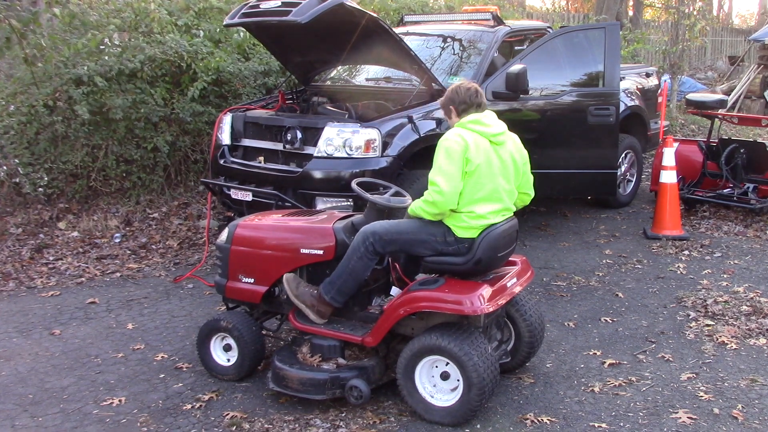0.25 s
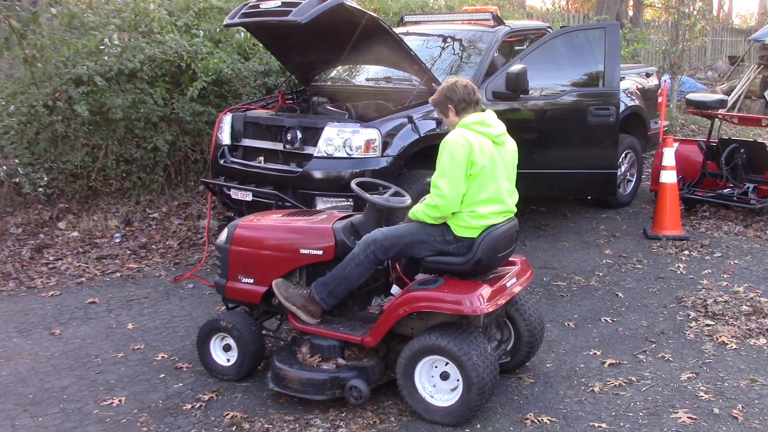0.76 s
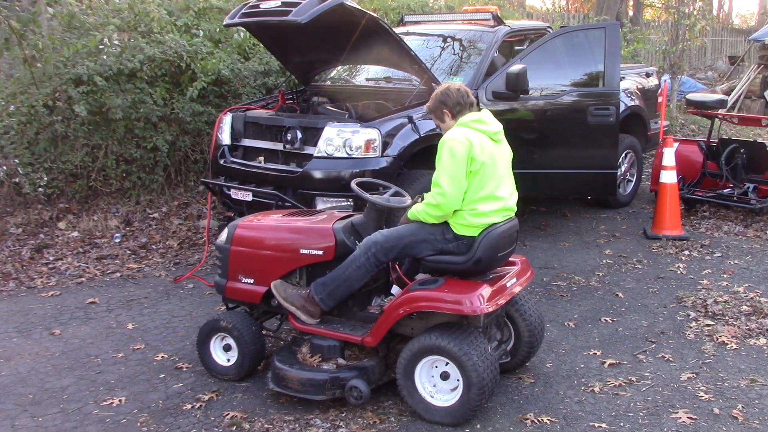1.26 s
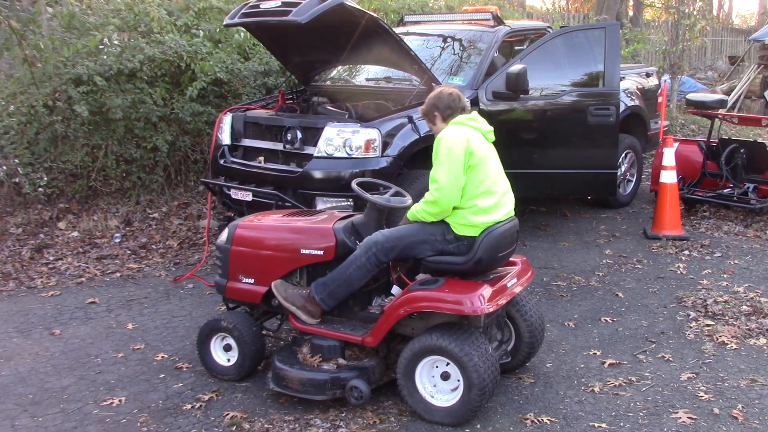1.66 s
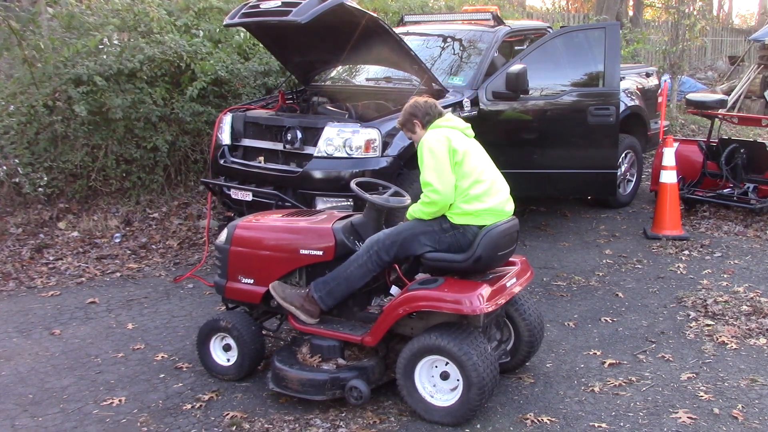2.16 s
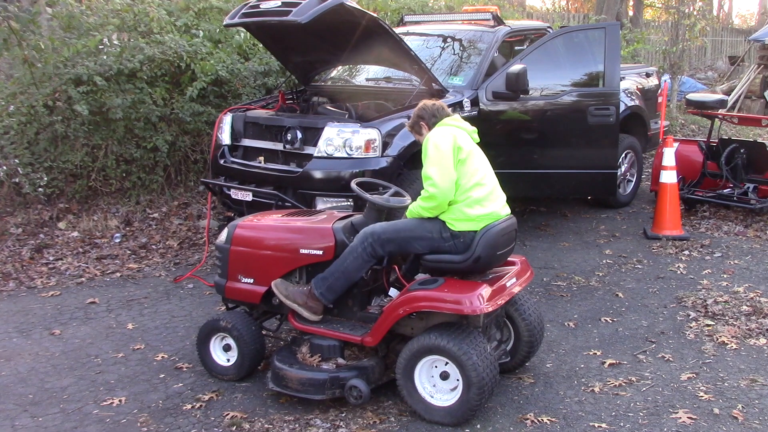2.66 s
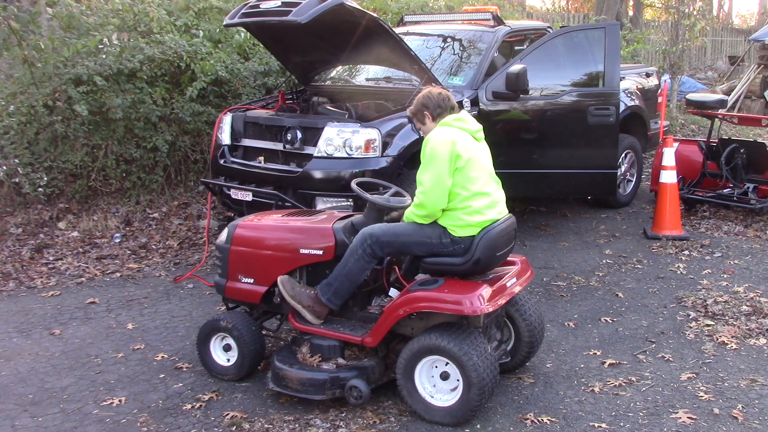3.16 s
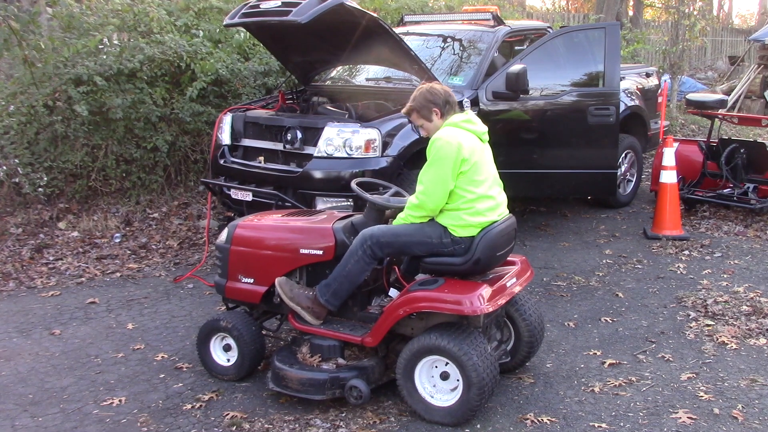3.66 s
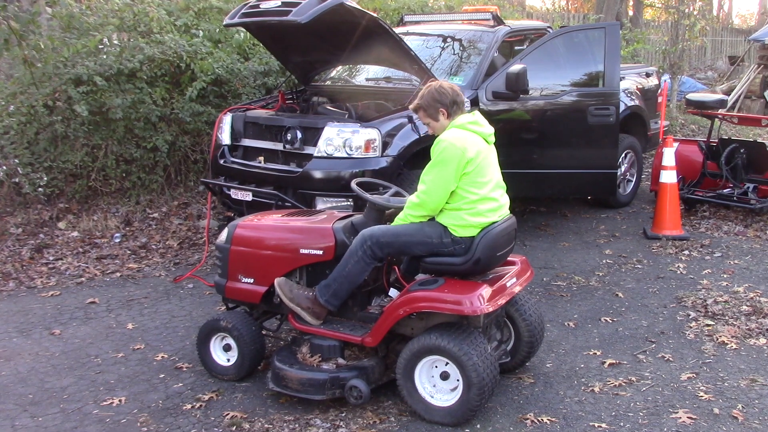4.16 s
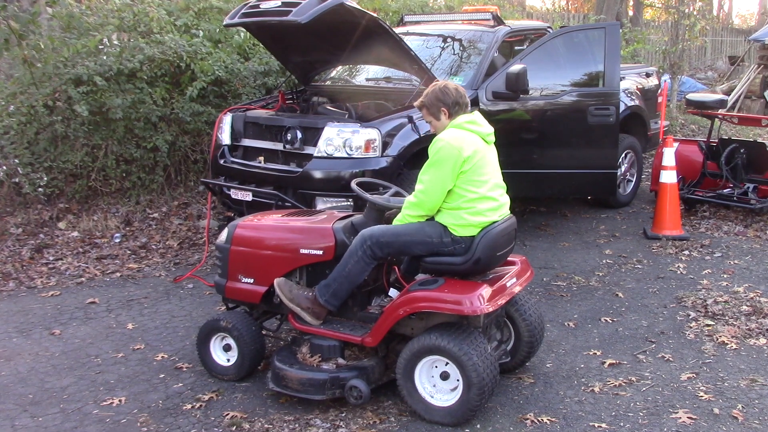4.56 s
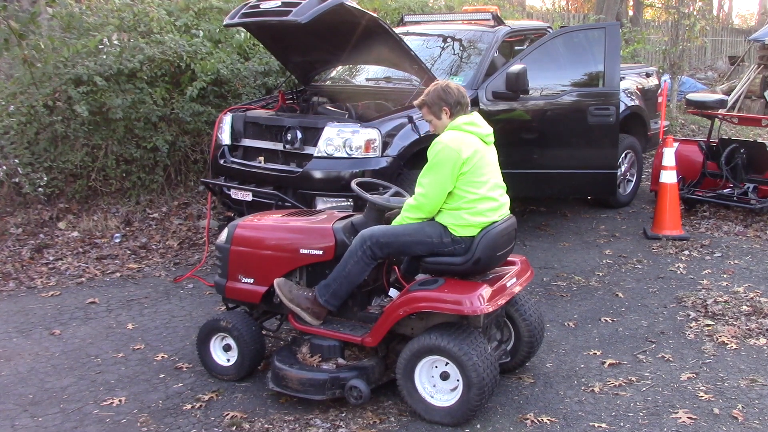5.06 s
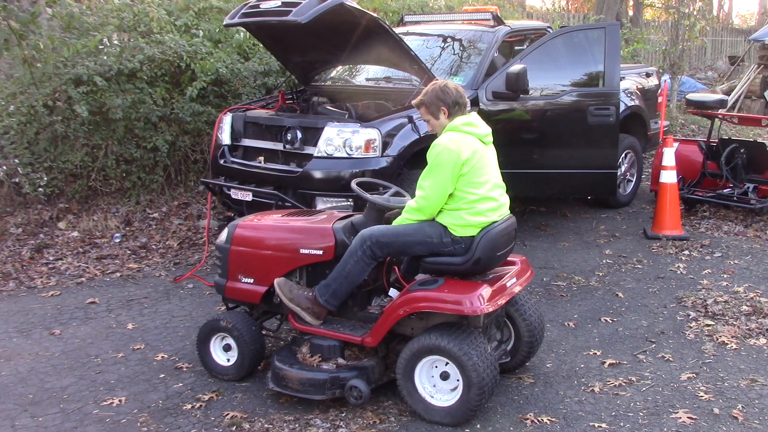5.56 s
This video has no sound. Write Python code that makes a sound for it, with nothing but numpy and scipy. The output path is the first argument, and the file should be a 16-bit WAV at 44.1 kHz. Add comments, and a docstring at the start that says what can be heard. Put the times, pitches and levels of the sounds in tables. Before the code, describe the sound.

A rider settles on a riding mower in a quiet driveway: soft knocks, a short seat creak with a squeak, one hard clunk, then small key clicks and lever clacks. After a brief gap the starter slams in and grinds, sagging at each compression, with breathy intake gulps and exhaust puffs. Close, nearly mono, with short dull outdoor reflections and a faint far bird.

```python
"""First knocks and a creaking seat as a rider settles on a riding mower in a driveway, then key and levers click.
The solenoid snaps, and the starter pinion slams into the flywheel and grinds the small petrol engine up to speed.
Each compression brakes the crank, with a double gulp of intake air before it and a puff of exhaust after.
Blows and gears are noise and impulses ringing in resonances; gas is shaped noise; yard air and a far bird lie behind.
The picture is nearly mono: only a faint hiss differs between the channels."""
import sys
import numpy as np
from scipy import signal
from scipy.fft import rfft, irfft
from scipy.io import wavfile
from scipy.ndimage import uniform_filter1d

SR = 44100
rng = np.random.default_rng(int(sys.argv[2]) if len(sys.argv) > 2 else 0)


def master(y):
    """Save y as 16-bit WAV."""
    cut = np.clip(np.atleast_2d(y).T, -1, 1)
    pcm = np.round(cut * 32767)  # scale
    wavfile.write(sys.argv[1], SR, pcm.astype(np.int16))


N = 255780
TIME = np.arange(N) / SR


def amp(db):
    """Decibels to gain."""
    return 10 ** (np.asarray(db) / 20)


def unit(x):
    """Scale to rms 1."""
    return x / np.sqrt(np.mean(x ** 2))


def crest(x):
    """Scale so that the loudest 8 ms have rms 1."""
    return x / np.sqrt(uniform_filter1d(x ** 2, size=353).max())


def noise(size=N):
    """White noise."""
    return rng.standard_normal(size)


def curves(table):
    """The columns of a table, joined by straight lines in time."""
    s, *columns = np.transpose(table)
    return [np.interp(TIME, s, column) for column in columns]


def colour(x, points):
    """Causal filter through (frequency [Hz], level [dB]) points, falling 24 dB per octave for two octaves beyond."""
    hz, db = np.transpose(points)
    size = 8192
    octave = np.log2(np.maximum(np.fft.rfftfreq(size, 1 / SR), 1))
    outside = np.abs(octave - np.clip(octave, np.log2(hz[0]), np.log2(hz[-1])))
    spectrum_db = np.interp(octave, np.log2(hz), db) - 24 * np.minimum(outside, 2)
    # folding the cepstrum gives minimum phase, so nothing sounds before its cause
    cepstrum = irfft(np.log(amp(spectrum_db)))
    cepstrum[1:size // 2] *= 2
    cepstrum[size // 2 + 1:] = 0
    return signal.fftconvolve(x, irfft(np.exp(rfft(cepstrum))))[:len(x)]


def band(x, hz, kind):
    """Third-order Butterworth filter."""
    return signal.sosfilt(signal.butter(3, hz, kind, fs=SR, output="sos"), x + 1e-18)


def resonate(x, peaks):
    """Parallel (frequency [Hz], width [Hz], level [dB]) resonances of alternating polarity."""
    out = np.zeros(len(x))
    for k, (hz, width, db) in enumerate(peaks):
        b, a = signal.iirpeak(hz, hz / width, fs=SR)
        out += (-1) ** k * amp(db) * signal.lfilter(b, a, x + 1e-18)
    return out


def fade(t, t60):
    """Exponential decay by 60 dB in t60 seconds."""
    return np.exp(-np.log(1000) * t / t60)


def swell(peak_s, attack, release):
    """A smooth rise to 1 and a smooth fall."""
    t = TIME - peak_s
    return np.exp(-.5 * (t / np.where(t < 0, attack, release)) ** 2)


def walk(rate):
    """Smooth random wander with rms 1, taking a new direction `rate` times a second."""
    k = int(SR / rate)
    steps = np.repeat(noise(N // k + 1), k)
    return unit(uniform_filter1d(steps, k)[:N])


def wavering_tone(hz):
    """Sine that follows a moving pitch."""
    return np.sin(2 * np.pi * np.cumsum(hz) / SR)


def pulses(hz, jitter, scatter_db):
    """One impact in each cycle, each a little early or late and of its own size."""
    phase = np.cumsum(hz) / SR
    chance = noise((N // 10, 2))[:int(phase[-1])]
    at = np.interp(np.arange(len(chance)) + jitter * chance[:, 0], phase, np.arange(N))
    size = amp(scatter_db * np.clip(chance[:, 1], -2, 2))
    return np.bincount(at.astype(int), size, N)


def bend(x, share):
    """Let the pitch of x run sharp or flat by a moving share, through a wandering delay."""
    drift = signal.lfilter([1], [1, -np.exp(-1 / SR / .1)], share)
    return np.interp(np.arange(N) + drift, np.arange(N), x)


def add(out, s, x):
    """Mix x into out from time s."""
    i = max(int(s * SR), 0)
    out[i:i + len(x)] += x[:N - i]


# microphone hiss spectrum: (frequency [Hz], relative level [dB])
HISS_COLOUR = [(25, -16), (65, -14), (190, -5.5), (450, -3), (1000, -10), (2100, -16.5), (3000, -25.5),
               (15000, -39)]


def hiss():
    """Very faint noise of the microphone capsules."""
    return amp(-81.5) * unit(colour(noise(), HISS_COLOUR))


# outdoor air spectrum: (frequency [Hz], relative level [dB])
YARD_COLOUR = [(15, -83), (25, -31), (101, -5), (164, -6.5), (233, -4.5), (267, -8.5), (359, -13),
               (421, -5.5), (648, -11.5), (848, -9.5), (1020, -14.5), (1240, -16.5), (7300, -28),
               (12800, -36.5), (15500, -48)]


def yard():
    """Quiet outdoor air with the wavering hum of distant motors."""
    air = unit(colour(noise(), YARD_COLOUR)) * amp(0.55 * walk(3.15))
    motors = unit(resonate(noise(), [(205, 25, 1), (425, 8, 0), (850, 25, -3)]))
    waver = amp(2 * walk(2.5))
    return amp(-60.5) * (air + amp(-8.5) * motors * waver)


# far bird's whistles: (time [s], length [s], start pitch [Hz], end pitch [Hz], level before the flutter [dB])
BIRD_WHISTLES = [(.14, .09, 3900, 3800, -71), (1.8, .13, 3700, 3630, -69), (1.94, .14, 3560, 3460, -69),
                 (3.77, .17, 3680, 3550, -72)]


def bird():
    """A far bird's thin whistles: fluttering sines that slide down."""
    out = np.zeros(N)
    for s, length, start_hz, end_hz, db in BIRD_WHISTLES:
        hz = np.linspace(start_hz, end_hz, int(length * SR))
        add(out, s, amp(db) * np.hanning(len(hz)) ** .5 * wavering_tone(hz))
    flutter = amp(3 * walk(70) - 1)
    return out * flutter


def echoes(x, wet_db, t60):
    """Dull, scattered reflections from the parked truck, the hedge and the house, as decaying noise."""
    t = TIME[:SR // 2]
    build_up = np.clip((t - .008) / 0.018, 0, 1)
    tail = band(noise(len(t)), 3040, "low") * fade(t, t60) * build_up
    return amp(wet_db) * signal.fftconvolve(x, tail / np.linalg.norm(tail))[:N]


def thud():
    """One soft, very low thud under the cranking: a short swell of a 28 Hz sine."""
    s = 5.02
    return amp(-55) * swell(s, 0.013, 0.013) * np.sin(2 * np.pi * 28 * (TIME - s))


# light clicks of the key: (time [s], level [dB])
KEY_CLICKS = [(.328, -53.5), (.967, -52.5), (2.169, -54.5), (2.538, -49), (2.6, -52), (2.6385, -51),
              (2.668, -50), (2.752, -57), (3.151, -63), (3.685, -57)]
# their spectrum: (frequency [Hz], relative level [dB])
KEY_COLOUR = [(500, -9), (1500, 2.5), (2400, -0.5), (3200, 6), (4400, -2.5), (5100, -5.5), (6300, 4.5),
              (8200, -1.5), (11000, -6.5), (15500, -20)]


def key():
    """Small bright clicks, each a sharp tick with a short scrape behind it."""
    out, t = np.zeros(N), TIME[:SR // 4]
    for s, db in KEY_CLICKS:
        tick_and_scrape = fade(t, 0.0078) + 1.2 * fade(t, 0.14)
        contact = noise(len(t)) * tick_and_scrape
        add(out, s, amp(db) * crest(colour(contact, KEY_COLOUR)))
    return out


# resonances of seat and hinge: (frequency [Hz], width [Hz], relative level [dB])
SEAT_BODY = [(317, 25, 2.5), (1021, 82, 0.5), (1590, 21, -19), (2010, 61, -5), (2510, 44, -5.5),
             (2805, 71, -8), (3600, 48, -15)]
HINGE_BODY = [(5900, 26, 3), (6800, 170, 0.5), (7140, 37, 5), (8300, 190, 0), (9560, 60, 1)]
# each sound of the seat builds and dies away: (peak time [s], attack [s], release [s])
CREAK_SWELL = (.53, .15, .03)
SQUEAK_SWELL = (.512, .02, .019)
SCRAPE_SWELL = (.49, .024, .024)


def seat():
    """Stick-slip creak of the seat, which locks briefly into a squeak while its hinge scrapes."""
    slips = unit(pulses(420 * amp(2 * walk(25)), jitter=0.33, scatter_db=1.5))
    rub = slips + amp(-3) * noise()
    rasp_colour = [(250, -3), (400, 7.5), (700, 2.0), (1100, 3.5), (2000, 0.5), (2800, -18), (4200, -16)]
    rasp = unit(colour(rub, rasp_colour))
    # the shifting load bends the resonances
    creak = unit(unit(resonate(slips, SEAT_BODY)) + amp(-0.5) * rasp)
    creak = bend(creak, 0.0193 * walk(28))
    scrape = bend(unit(resonate(slips, HINGE_BODY)), .012 * walk(35)) * amp(3.9 * walk(89.1))
    scrape = scrape + amp(-8.5) * band(rub, 5500, "high")
    squeak = unit(wavering_tone(1020 * (1 + 0.0478 * walk(160))) * amp(3.9 * walk(119.3)))
    sound = amp(-48.5) * swell(*CREAK_SWELL) * creak
    sound += amp(-39) * swell(*SQUEAK_SWELL) * squeak
    sound += amp(-52.5) * swell(*SCRAPE_SWELL) * scrape
    return sound * (TIME > .33)  # silent until the seat is loaded


def blows(table, modes, spectrum, ring_db, note_db, bass_hold, treble_hold, grain_db, rise_share):
    """Loose parts chatter after each blow, sound their note and ring the body; long rattles start softly."""
    out, t = np.zeros(N), TIME[:SR // 2]
    for s, bass_db, middle_db, treble_db, t60, hz in table:
        bounces = amp(grain_db * walk(400)[:len(t)])
        # the holds stretch or shorten the rattle of the outer bands
        parts = [(bass_db, 900, "low", bass_hold),
                 (middle_db, (900, 4500), "band", 1),
                 (treble_db, 4500, "high", treble_hold)]
        for db, edges, kind, hold in parts:
            rise = np.minimum(t / (rise_share * t60 * hold), 1)
            chatter = noise(len(t)) * bounces * rise * fade(t, t60 * hold)
            clunk = colour(chatter, spectrum)
            clunk = clunk + resonate(clunk, [(hz, hz / 22, note_db)])
            sound = unit(clunk) + amp(ring_db) * unit(resonate(chatter, modes))
            add(out, s, amp(db) * crest(band(sound, edges, kind)))
    return out


# spectrum of knocks and levers: (frequency [Hz], relative level [dB])
CLUNK_COLOUR = [(47, -38), (80, -52), (173, -5.5), (343, 1), (532, 3.5), (663, 4), (884, -2.5), (1030, -4),
                (1500, -11), (3540, -12), (5040, -31), (5880, -16.5), (8550, -17.5), (11100, -32),
                (15500, -43)]
# dash controls being set:
# (time [s], bass [dB], middle [dB], treble [dB], middle rattle t60 [s], note of the struck part [Hz])
LEVER_BLOWS = [(3.489, -57.5, -68, -86, 0.095, 520), (3.572, -57, -46, -63, 0.13, 1780),
               (3.646, -50, -55, -82, 0.029, 510), (3.7385, -43, -41.5, -63, 0.018, 1730),
               (3.879, -44.5, -47.5, -79, .051, 490), (3.891, -51.5, -46, -56.5, 0.05, 1430)]
# resonances of the dash: (frequency [Hz], width [Hz], relative level [dB])
DASH_BODY = [(455, 35, 9), (576, 29, 14), (699, 16, 5.5), (1406, 63, -4), (1670, 55, -7), (2540, 33, -7),
             (2960, 20, -21), (3170, 43, -10)]


def levers():
    """Dash levers clack into place and ring the dash."""
    return blows(LEVER_BLOWS, DASH_BODY, CLUNK_COLOUR, ring_db=1, note_db=11,
                 bass_hold=1.1, treble_hold=.8, grain_db=1.5, rise_share=.025)


# seat, pedal and levers striking the chassis:
# (time [s], bass [dB], middle [dB], treble [dB], middle rattle t60 [s], note of the struck part [Hz])
CHASSIS_BLOWS = [(0.001, -48.5, -54.5, -69.5, 0.29, 510), (.271, -48.5, -50, -69, 0.11, 506),
                 (.334, -48, -49.5, -66, 0.18, 1640), (.511, -52, -43, -66, 0.13, 985),
                 (.548, -42, -54, -57.5, 0.12, 1040), (.841, -34.5, -35.5, -31, 0.13, 870),
                 (1.776, -45, -42.5, -53, 0.09, 1750), (2.199, -38, -34.5, -46, 0.12, 1306),
                 (2.24, -40.5, -51, -62, 0.17, 695), (2.811, -39, -43, -57, 0.22, 1050),
                 (2.85, -45.5, -47.5, -53.5, .19, 675)]
# resonances of the chassis: (frequency [Hz], width [Hz], relative level [dB])
CHASSIS_BODY = [(360, 62, 10), (690, 13, 12), (1649, 33, -1.5), (2787, 27, -2), (3407, 16, -13.5),
                (3740, 30, -8.5), (5700, 34, -17), (7060, 61, -13), (7000, 180, -23), (8270, 21, -32),
                (8970, 98, -11)]
# thin ring of steel after the hardest knock: (frequency [Hz], level [dB], t60 [s])
STEEL_RING = [(14700, -52, .4), (15330, -56, .55)]


def knocks():
    """Seat, pedal and levers strike the chassis; the hardest knock leaves thin decaying sines of steel."""
    out = blows(CHASSIS_BLOWS, CHASSIS_BODY, CLUNK_COLOUR, ring_db=-4.5, note_db=7,
                bass_hold=1.39, treble_hold=0.77, grain_db=2.5, rise_share=0.0075)
    t = TIME[:SR // 2]
    for hz, db, t60 in STEEL_RING:
        tone = np.sin(2 * np.pi * hz * t + rng.uniform(0, 2 * np.pi))
        add(out, .842, amp(db) * fade(t, t60) * tone)
    return out


# solenoid and pinion slamming home:
# (time [s], bass [dB], middle [dB], treble [dB], middle rattle t60 [s], note of the struck part [Hz])
SLAM_BLOWS = [(4.349, -43, -27.5, -34, 0.07, 1350), (4.356, -39, -33, -47, 0.069, 2450),
              (4.373, -34, -32, -30.5, .08, 7700), (4.382, -21.5, -24, -33, 0.071, 1690),
              (4.398, -22.5, -33, -44, .07, 480)]
# what they ring: (frequency [Hz], width [Hz], relative level [dB])
SLAM_BODY = [(432, 45, -6), (655, 30, 6), (1100, 38, -8.5), (1280, 15, 2), (1530, 240, -16), (2130, 18, -3),
             (2450, 22, -12), (2950, 24, -23), (3240, 112, -9)]
# their spectrum: (frequency [Hz], relative level [dB])
SLAM_SPECTRUM = [(100, -22), (210, -4), (480, -0.5), (660, 9), (950, -4.5), (1400, 1.5), (2500, 2.5),
                 (3200, -3.5), (4500, -24), (6200, -17.5), (9000, -17), (15500, -38)]


def slams():
    """The solenoid snaps and throws the pinion into the flywheel."""
    return blows(SLAM_BLOWS, SLAM_BODY, SLAM_SPECTRUM, ring_db=-5, note_db=10,
                 bass_hold=1.1, treble_hold=.9, grain_db=1, rise_share=.045)


# muffler resonances: (frequency [Hz], width [Hz], relative level [dB])
MUFFLER = [(129, 56, -4), (171.4, 70, 3.5), (219, 160, -0.5)]
# turbulence spectrum: (frequency [Hz], relative level [dB])
TURBULENCE_COLOUR = [(150, -39), (230, -10), (400, -6), (650, -3), (1000, -8), (2000, -15), (3300, -29),
                     (5000, -48), (7000, -31), (15000, -45)]


def puff(s, db, length, rasp_db):
    """A slug of gas thumps through the muffler, with a rasp of turbulence."""
    out, t = np.zeros(N), TIME[:SR // 4]
    lead = .08  # seconds of room for the rise of the flow
    flow = np.exp(-.5 * ((t - lead) / length) ** 2)
    front = np.exp(-.5 * ((t - lead) / 0.00096) ** 2)
    slug = unit(front) + amp(-3) * unit(band(flow * noise(len(t)), 290, "low"))
    thump = band(resonate(slug, MUFFLER), 110, "high")
    rasp = colour(flow * noise(len(t)), TURBULENCE_COLOUR)
    add(out, s - lead - .004, amp(db + 5.5) * crest(thump))
    add(out, s - lead, amp(db + rasp_db) * crest(rasp))
    return out


# piston at the top of a compression (a puff adds 5.5 dB to its thump):
# (time [s], free crank speed [turns/s], intake base [dB], intake rasp over base [dB], exhaust base [dB])
STROKES = [(4.598, 3.6, -54.5, 18.5, -40.5), (5.066, 5.94, -43, -7, -48), (5.386, 6.5, -38, 0, -48),
           (5.684, 6.72, -39.5, 5.5, -46)]
# the two gulps of each intake: (crank angle after the top [turns], length [s], level over base [dB])
GULPS = [(-.42, 0.01, -5), (-.25, 0.013, 1.5)]


def valves():
    """The valves keep their crank angles: a double gulp before each compression, a puff of exhaust after it."""
    out = np.zeros(N)
    for s, speed, intake_db, rasp_db, exhaust_db in STROKES:
        for turns, length, db in GULPS:
            out += puff(s + turns / speed, intake_db + db, length, rasp_db)
        out += puff(s + 0.41 / speed, exhaust_db, length=0.009, rasp_db=-5)
    return out


def each_cycle(turns, attack_turns, release_turns):
    """A swell at the same crank angle in every cycle, so shorter as the crank gets faster."""
    return sum(swell(s + turns / speed, attack_turns / speed, release_turns / speed)
               for s, speed, *_ in STROKES)


ENGAGE_S = 4.385  # the pinion bites
START_TURNS_PER_S = 3.1  # free crank speed at that moment
STALL_TURNS_PER_S = 3.05  # a crank this slow would just be stopped by a compression


def crank():
    """Free and braked speed: each compression takes the same energy, so the first brakes the crank most."""
    free, = curves([(ENGAGE_S, START_TURNS_PER_S)] + [row[:2] for row in STROKES])
    # the load builds before the top and lets go after it
    load = each_cycle(0, attack_turns=.17, release_turns=.08)
    return free, np.sqrt(np.maximum(free ** 2 - STALL_TURNS_PER_S ** 2 * load, 1))


def tooth_force(speed):
    """Uneven tooth impacts; about once a pinion turn the backlash closes and they bite harder."""
    mesh_hz = 84 * speed  # teeth on the ring gear
    pinion_hz = mesh_hz / 14  # teeth on the pinion
    closings = pulses(pinion_hz, jitter=0.3, scatter_db=0.5)
    clacks = signal.fftconvolve(closings, fade(TIME[:SR // 10], 0.039))[:N]
    teeth = unit(pulses(mesh_hz, jitter=.12, scatter_db=2.5))
    sliding = amp(-4) * noise()
    return (1 + 0.8 * clacks) * (teeth + sliding)


# gears as the starter runs up, before load and clashes move them:
# (time [s], grinding [dB], bright tooth edges [dB])
GEAR_RUN_UP = [(4.45, -38, -46), (4.79, -36, -47.5), (4.845, -31, -42), (5.8, -31.5, -43)]
# pinion clashes on entering and when the first compression lets go:
# (time [s], grinding gain [dB], edge gain [dB], attack [s], release [s])
PINION_CLASHES = [(4.39, 10.5, 14, .02, 0.024), (4.652, 5, 10, 0.013, 0.02)]


def gear_levels(free, speed):
    """Grinding and edges in dB: grinding sinks with the braked crank, both rise when teeth bite or clash."""
    grind_db, edge_db = curves(GEAR_RUN_UP)
    bite_db = 3 * each_cycle(-0.3, 0.065, 0.16)  # the load comes on
    uneven_db = 1.0 * walk(22)  # the mesh tightens and loosens at random
    braked_db = 1.5 * 20 * np.log10(speed / free)
    slack_db = -3.5 * each_cycle(0, 0.17, 0.27)  # the edges dull around the top
    grind_db = grind_db + bite_db + uneven_db + braked_db
    edge_db = edge_db + 0.57 * bite_db + slack_db
    for s, grind_gain_db, edge_gain_db, attack, release in PINION_CLASHES:
        clash = swell(s, attack, release)
        grind_db = grind_db + grind_gain_db * clash
        edge_db = edge_db + edge_gain_db * clash
    return grind_db, edge_db


# ringing of flywheel, shroud and hood, then of the ring gear: (frequency [Hz], relative level [dB])
HOUSING_RING = [(209.9, -59), (333.8, -40.5), (527.6, -55.5), (656.8, -39.5), (791.3, -50), (882.9, -46.5),
                (1114, -46), (1750, -39), (2073, -45.5), (2213, -61)]
GEAR_RING = [(5556, -75), (5895, -61), (7187, -81), (7450, -68.5), (9157, -97), (12059, -78.5)]
# spectra of the grinding and of the bright tooth edges: (frequency [Hz], relative level [dB])
GRIND_COLOUR = [(110, -32), (160, -15), (210, -1.5), (285, -4.5), (520, 4.5), (700, -0.5), (930, -3),
                (1180, 4.5), (1550, -0.5), (2100, -1.5), (2600, -7.5), (2950, -13), (3250, -1.5),
                (4100, -30)]
BRIGHT_COLOUR = [(3600, -2.5), (4500, -6.5), (5100, -9), (5650, 5.5), (6300, -0.5), (6900, -6), (7450, 1.5),
                 (8400, -8.5), (10000, -8.5), (10900, -17), (12050, -18), (13500, -20), (15600, -19.5)]


def starter():
    """The pinion drives the flywheel's ring gear, and its teeth ring the gear and the engine's housing."""
    free, speed = crank()
    grind_db, edge_db = gear_levels(free, speed)
    pace = speed / speed.max()
    force = tooth_force(speed)
    # the thin panels smear each tooth over a few milliseconds
    smear = np.sqrt(signal.lfilter(fade(TIME[:SR // 20], 0.018), 1, force ** 2)) * noise()
    edges = unit(force) + amp(7) * unit(smear)
    housing = unit(resonate(force, [(hz, 13 + hz / 55, db) for hz, db in HOUSING_RING]))
    gear = unit(resonate(edges, [(hz, hz / 55, db) for hz, db in GEAR_RING]))
    # the flywheel sings more as the run-up goes on
    run_up = np.clip((TIME - 4.7) / .7, 0, 1)
    flywheel = amp(-8) * unit(resonate(force, [(1750, 20, 0)])) * run_up
    grind = unit(unit(colour(edges, GRIND_COLOUR)) + amp(-2.5) * housing) + flywheel
    # slow teeth strike softly: above 2560 Hz the grinding follows the speed
    dull = signal.sosfiltfilt(signal.butter(2, 2560, fs=SR, output="sos"), grind)
    grind = dull + (grind - dull) * pace
    # slow teeth ring the gear clearly, fast ones blur into a hiss; the ringing comes and goes at random
    bright = unit(colour(edges, BRIGHT_COLOUR)) * pace + amp(-8) * gear * amp(3 * walk(35))
    # the frame drones while the motor strains, and less as the crank speeds up
    drone = unit(wavering_tone(207.8 * (1 + 0.029 * walk(40))) * amp(1.5 * walk(24.95)))
    strain = amp(-43) * (START_TURNS_PER_S / free) ** 2.8
    sound = amp(grind_db) * grind + amp(edge_db) * bright + strain * drone
    return sound * np.clip((TIME - ENGAGE_S) / 0.0082, 0, 1)


def scene():
    """Mower, echoes, yard and bird, alike in both channels; the hiss has opposite polarity in each."""
    mower = thud() + key() + seat() + levers() + knocks() + slams() + valves() + starter()
    mid = yard() + bird() + echoes(mower, wet_db=-17.5, t60=0.35) + mower
    side = hiss()
    return np.array([mid + side, mid - side])


def record(dry):
    """A steep low-pass removes everything well above 15.8 kHz."""
    return signal.sosfilt(signal.ellip(10, .2, 70, 15800, fs=SR, output="sos"), dry)


dry = scene()
out = record(dry)
master(out)
```